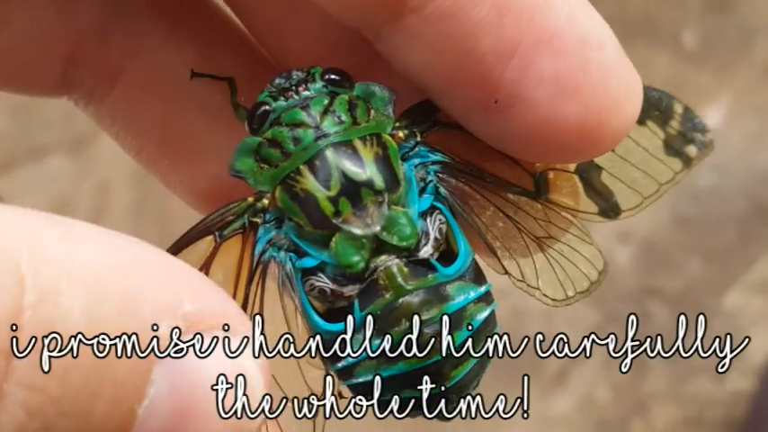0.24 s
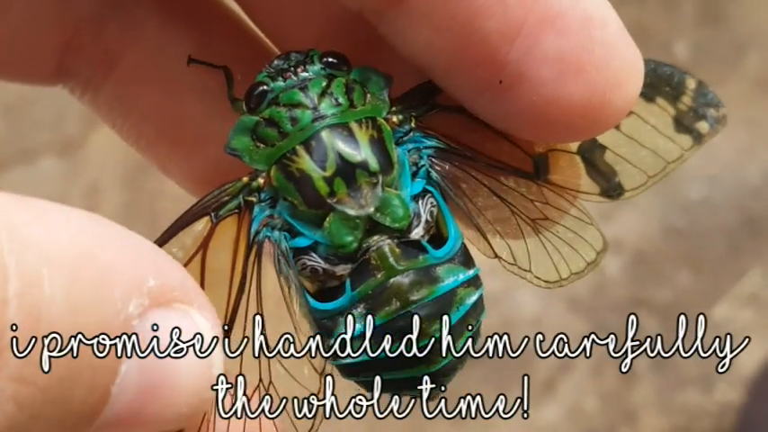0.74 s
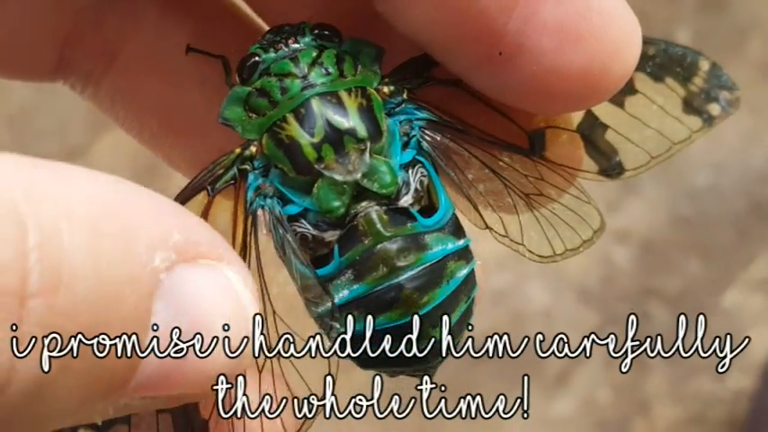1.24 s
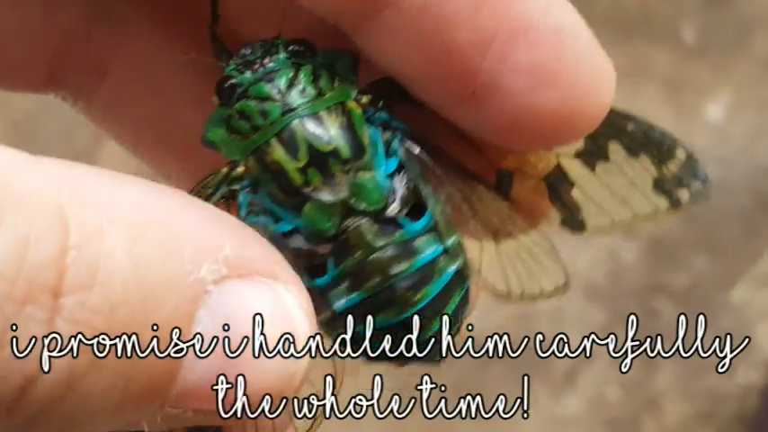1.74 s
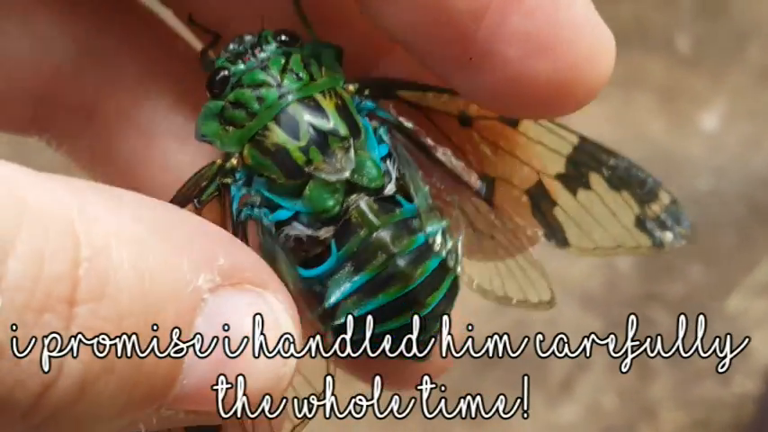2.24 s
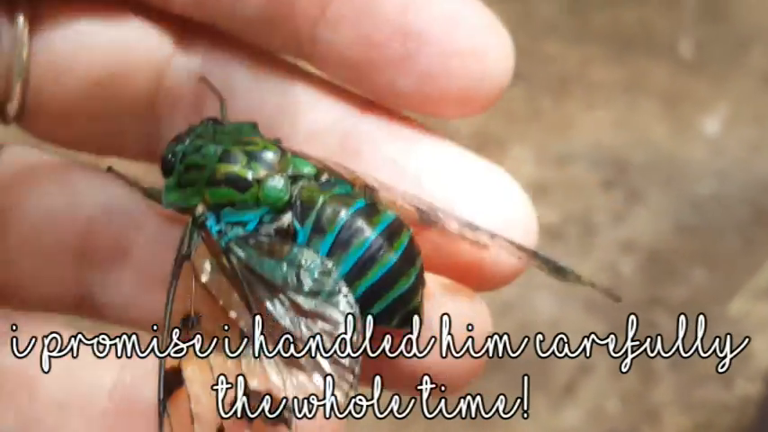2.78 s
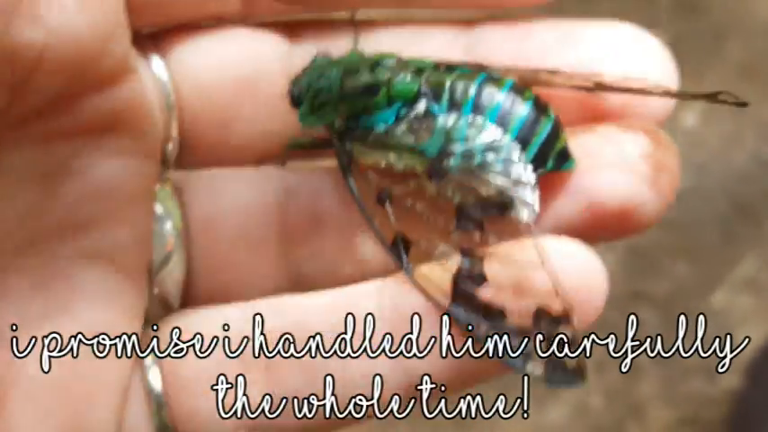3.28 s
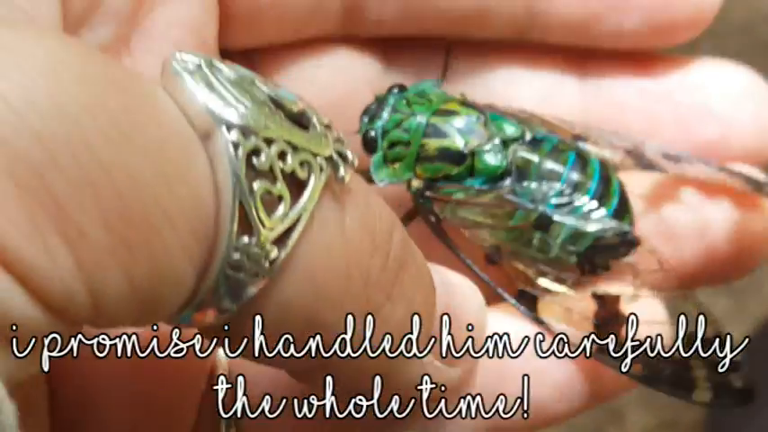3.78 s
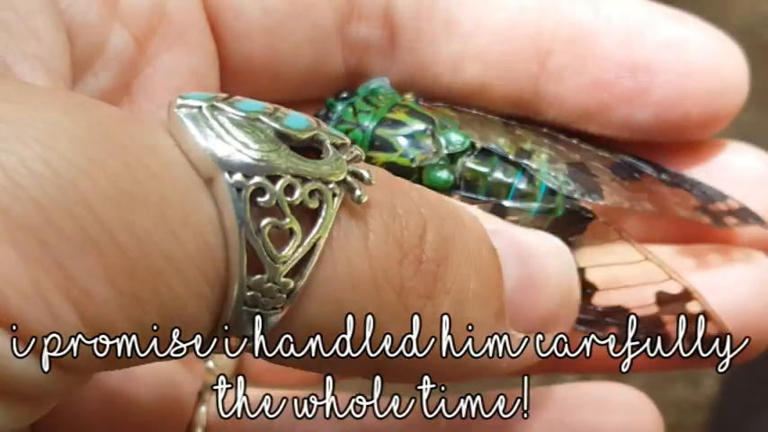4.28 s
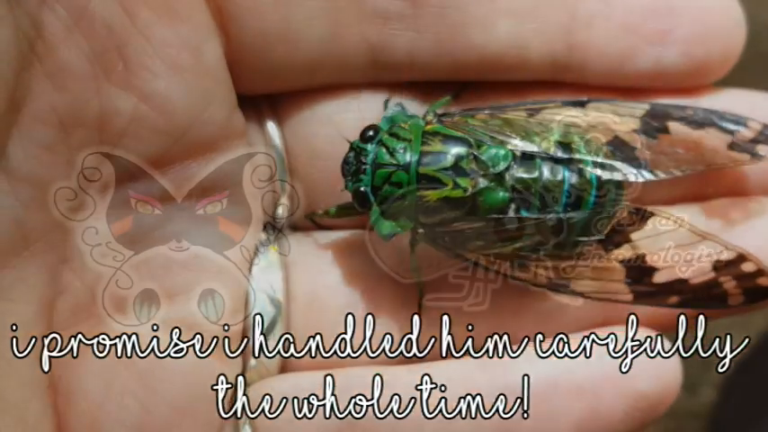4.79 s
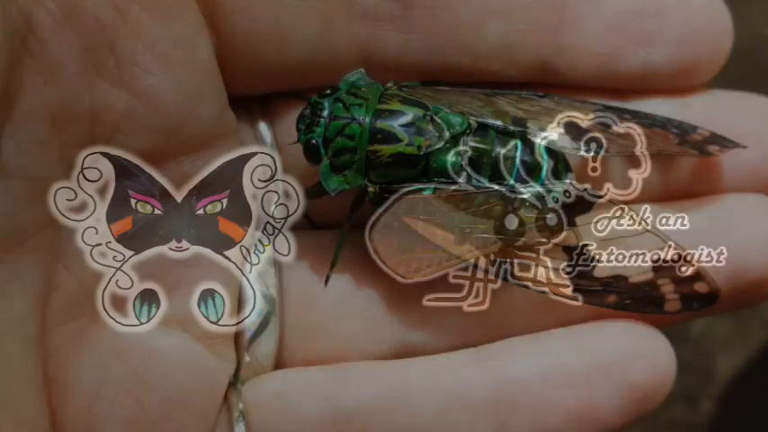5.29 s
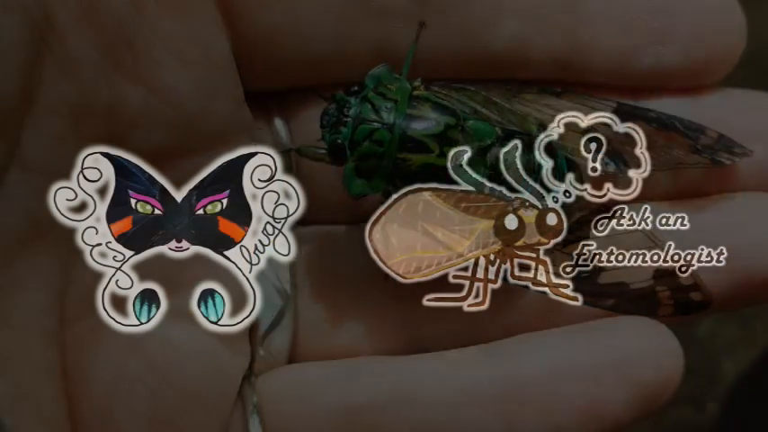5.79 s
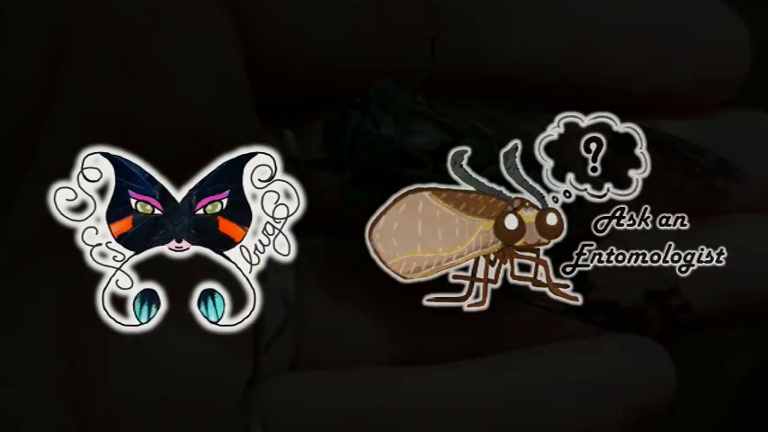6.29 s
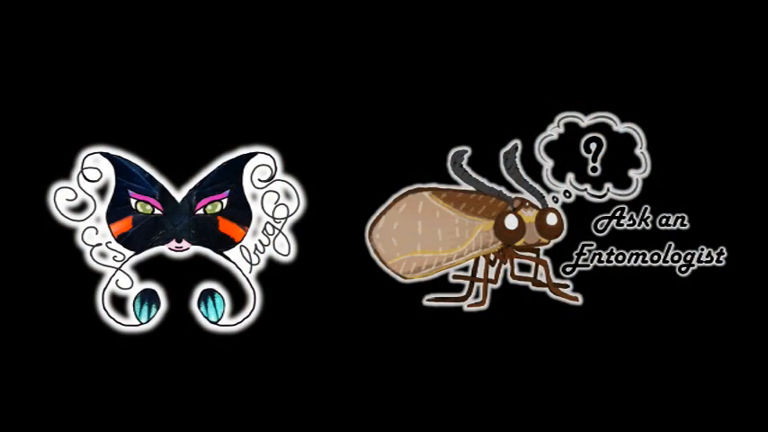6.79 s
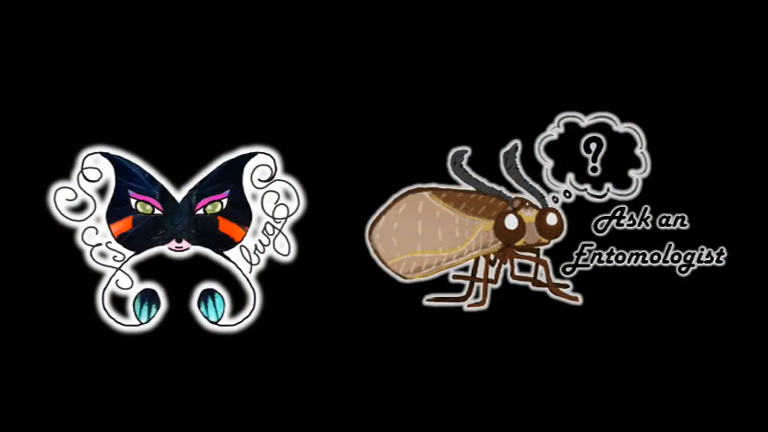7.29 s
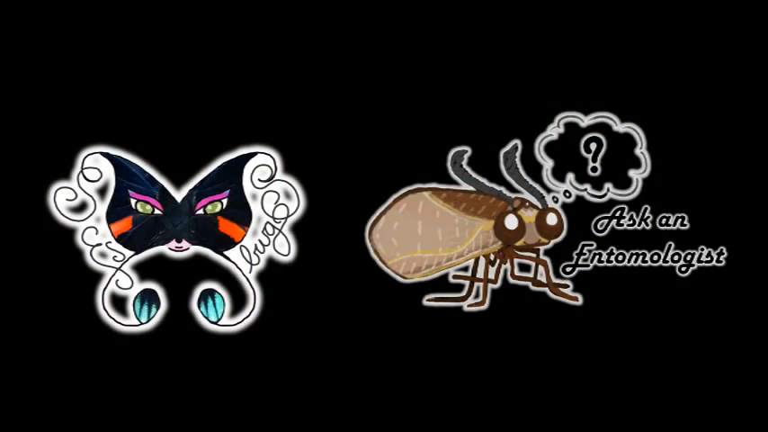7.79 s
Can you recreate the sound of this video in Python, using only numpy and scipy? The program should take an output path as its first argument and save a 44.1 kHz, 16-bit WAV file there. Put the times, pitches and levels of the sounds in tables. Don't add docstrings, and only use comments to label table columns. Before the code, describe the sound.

An outdoor stereo scene of massed cicadas in trees, with no handling sounds. From 0 seconds the background opens quickly and a soft, raspy buzz begins; one nearer singer, slightly left, gives a cleaner pitched buzz that peaks around 0.2 and soon sinks into the crowd. The chorus climbs rapidly through the first second, then more gradually until about 3. Its countless rapid clicks merge into a dense, shrill drone, strongest around 3.5 to 5 kilohertz, with a fine shimmer near 15. Thin, faint grass insects sing higher up, settling after the start. From 3 to 5 the song holds, wide and steady, slightly grainy. After 5 it tires, losing some lower body and top shimmer, fading noticeably from 6 to 8 but still sounding at the end. Faint distant rumble continues underneath; a low broad air hum stops suddenly at about 6.5. Very slight microphone hiss.

```python
import sys
import numpy as np
from scipy import signal
from scipy.fft import rfft, irfft, next_fast_len
from scipy.io import wavfile

SR = 44100
rng = np.random.default_rng(int(sys.argv[2]) if len(sys.argv) > 2 else 0)


def store_wav(level_fs):
    pcm = np.round(np.clip(np.atleast_2d(level_fs), -1, 1) * 32767)
    wavfile.write(sys.argv[1], SR, pcm.T.astype(np.int16))


def how_loud(loudness_db):
    steps = np.asarray(loudness_db, float) / 20
    return 10 ** steps


N = 354563
TIME_S = np.arange(N) / SR


def evened(x):
    return x / np.sqrt(np.mean(x ** 2) + 1e-20)


def read(points, hz):
    f, value = np.transpose(points)
    return np.interp(np.log(hz + 1), np.log(f + 1), value)


def opened(db, start_db):
    open_s = 0.32
    return db + start_db * np.clip(1 - TIME_S / open_s, 0, 1)


# frequency in Hz, left minus right in dB.
SHADOW = [(80, 0), (200, 2), (500, -0.5), (1100, 2.5), (2200, -0.5), (3100, 0), (3600, 1), (4000, -7.5),
          (4400, -3), (4900, -.5), (5500, 4.5), (6400, 7.5), (8000, 4.5), (11000, 1.5), (13500, -1.3),
          (15600, 2)]


def colour(x, points):
    size = next_fast_len(N)
    hz = np.fft.rfftfreq(size, 1 / SR)
    db = read(points, hz) + np.outer([.5, -.5], read(SHADOW, hz))
    inside = (hz > points[0][0]) & (hz < points[-1][0])
    return evened(irfft(rfft(x, size) * how_loud(db) * inside, size)[:, :N])


# frequency in Hz, left-right likeness from 0 to 1.
LIKENESS = [(25, .9), (60, .95), (260, .93), (400, .84), (550, .5), (800, .22), (1100, .33), (1500, .45),
            (1900, .28), (2300, .02)]


def murmur(shape, level_db):
    port_lag_s, bass_lag_share, full_lag_hz = .00034, .5, 1100
    size = next_fast_len(N)
    hz = np.fft.rfftfreq(size, 1 / SR)
    left, other = rfft(rng.standard_normal((2, size)))
    same = np.clip(read(LIKENESS, hz), 0, 1)
    rise = np.minimum(hz / full_lag_hz, 1) ** 3
    lag_s = port_lag_s * (bass_lag_share + (1 - bass_lag_share) * rise)
    delayed = left * np.exp(-2j * np.pi * hz * lag_s)
    right = same * delayed + np.sqrt(1 - same ** 2) * other
    ports = irfft(np.array([left, right]), size)[:, :N]
    return how_loud(level_db) * colour(ports, shape)


# frequency in Hz, density in dB per Hz.
AIR = [(15, -30), (30, -20), (80, -8), (120, -7), (165, -12.5), (230, -5), (330, -2.5), (620, -9),
       (900, -10), (1300, -14), (1900, -15.5), (2400, -14), (3100, -40)]


def far_air():
    return murmur(AIR, opened(-53.5, start_db=-4))


# frequency in Hz, density in dB per Hz.
HUM = [(20, -25), (40, -10), (80, -2), (150, 0.5), (300, -4), (600, -7.5), (1200, -9.5), (2000, -13.5),
       (3000, -46)]


def air_hum():
    stop_s, cut_s = 6.478, .005
    running = np.clip((stop_s - TIME_S) / cut_s, 0, 1)
    return running * murmur(HUM, opened(-51.3, start_db=-19))


def clicks(per_s, start):
    return np.diff(np.floor(start + np.cumsum(per_s) / SR), prepend=0.)


def foliage(x, t60, size=8192):
    t = np.arange(size) / SR
    starts = np.arange(0, N + size, size)
    padded = np.pad(x, (size, 3 * size), "wrap")
    pieces = padded[starts[:, None] + np.arange(2 * size)] * signal.windows.cosine(2 * size)
    echoes = rng.standard_normal((2, len(starts), size)) * how_loud(-60 * t / t60)
    heard = irfft(rfft(pieces, 3 * size) * rfft(echoes, 3 * size)).reshape(2, -1, 3, size)
    out = heard[:, 1:, 0] + heard[:, :-1, 1]
    out[:, 1:] += heard[:, :-2, 2]
    return out.reshape(2, -1)[:, :N]


def clicking_crowd(trees=8, singers=6, wander=.02, throb_db=1.5):
    samples, knots = np.arange(N), np.arange(0, N + 4000, 2000)
    crowd = np.zeros((2, N))
    for _ in range(trees):
        train = np.zeros(N)
        for _ in range(singers):
            drift, effort = rng.standard_normal((2, len(knots)))
            per_s = rng.uniform(240, 310) * (1 + wander * np.interp(samples, knots, drift))
            strength = how_loud(throb_db * np.interp(samples, knots, effort))
            train += clicks(per_s, rng.random()) * strength
        crowd += foliage(train - train.mean(), t60=.22)
    return crowd


# frequency in Hz, density in dB per Hz.
THIN = [(10900, -27), (11500, -9), (12200, -2), (13000, 1), (14000, 1), (15000, -2), (16500, -8)]


def grass_insects(crowd):
    sink_db, sink_s = -4.5, 1.6
    settle_db = sink_db * (1 - np.exp(-TIME_S / sink_s))
    other_crowd = crowd[:, ::-1]
    return how_loud(opened(-52.5, start_db=-6) + settle_db) * colour(other_crowd, THIN)


def nearer_singer():
    per_s, ring_hz, width_hz = 286, 5750, 600
    peak_db, peak_s, rise_db_per_s, fall_db_per_s = -48, 0.21, 40, 55
    lines = np.zeros(N)
    for k in range(17, 25):
        resonance = 1 / (1 + ((k * per_s - ring_hz) / (width_hz / 2)) ** 2)
        lines += resonance * np.cos(2 * np.pi * k * per_s * TIME_S)
    below_db = np.maximum(rise_db_per_s * (peak_s - TIME_S), fall_db_per_s * (TIME_S - peak_s))
    port_db = np.array([[2.5], [-2.5]])
    return how_loud(peak_db - below_db) * evened(lines) * how_loud(port_db)


# frequency in Hz, density in dB per Hz.
ABDOMEN = [(1500, -44), (2000, -34), (2500, -22.5), (2950, -17), (3200, -5), (3450, -0.5), (3650, 0),
           (3850, -6), (4200, -27), (4800, -43)]
TYMBAL = [(3300, -37), (3700, -21), (3950, -5.5), (4250, -1), (4550, 0.5), (4850, -1.5), (5300, -7),
          (5900, -12.5), (6400, -17), (6900, -26.5), (7300, -37), (7700, -40), (9000, -53)]
OVERTONE = [(4120, -16), (7000, -5), (7540, -9), (8990, -1.5), (11200, -17.5), (14600, -48), (22000, -120)]
SHIMMER = [(9500, -36), (10800, -31), (11500, -25.5), (12200, -19), (12800, -10.5), (13500, -4.5),
           (14200, -0.5), (14750, 4.5), (15300, 0.5), (15700, -4), (16500, -6)]
# level at full song in dB, share of the effort followed, extra sag late in
# the song in dB per s.
RINGS = [(-31, 1.02, 0.87), (-25.5, 0.99, 0.15), (-53, 1.15, -0.1), (-40, 0.9, 1.1)]
# time in seconds, level below full song in dB.
EFFORT = [(0, -15), (.11, -13.5), (.4, -8.5), (.65, -6), (1.2, -4), (1.7, -2.5), (2.2, -1.6), (2.7, -.4),
          (4.05, 0), (5.1, -0.67), (5.6, -0.5), (6.8, -2), (7.5, -3.5), (8.04, -5)]


def chorus(crowd):
    effort_db = np.interp(TIME_S, *np.transpose(EFFORT))
    late_s = np.maximum(TIME_S - 5.05, 0)
    song = np.zeros((2, N))
    for shape, (db, share, sag) in zip([ABDOMEN, TYMBAL, OVERTONE, SHIMMER], RINGS):
        level_db = 3 + db + share * effort_db - sag * late_s
        song += how_loud(level_db) * colour(crowd, shape)
    return song


def scene():
    crowd = clicking_crowd()
    return far_air() + air_hum() + grass_insects(crowd) + nearer_singer() + chorus(crowd)


def top_cut(x):
    return signal.sosfilt(signal.butter(12, 16870, fs=SR, output="sos"), x)


def record(dry):
    hiss_db, edge_hz, offset = -67, 15750, -.0011
    hissing = dry + how_loud(hiss_db) * rng.standard_normal(dry.shape)
    edge = signal.firwin(1023, edge_hz, window=("kaiser", 9), fs=SR)
    mix = signal.oaconvolve(hissing, edge[None], "same", axes=1) + offset
    return top_cut(mix)


dry = scene()
out = record(dry)
store_wav(out)
```